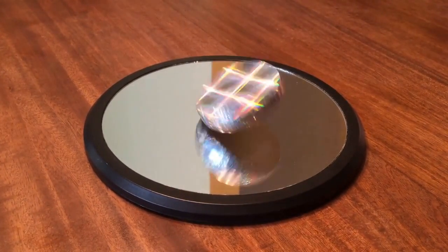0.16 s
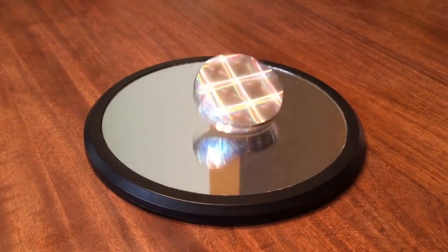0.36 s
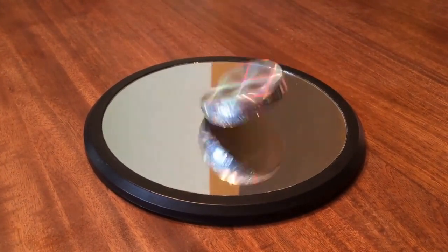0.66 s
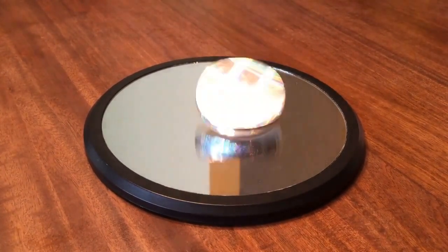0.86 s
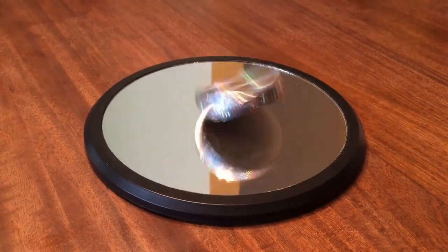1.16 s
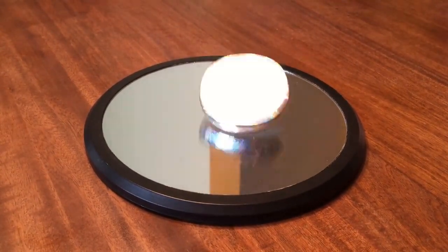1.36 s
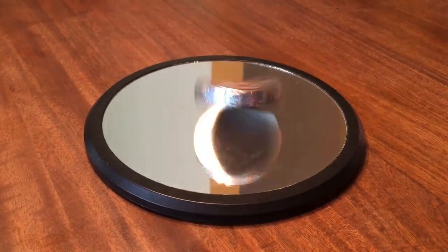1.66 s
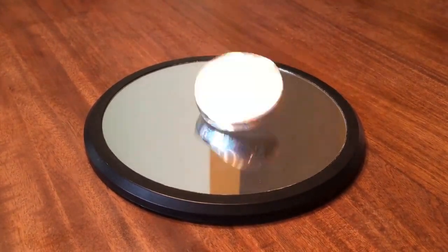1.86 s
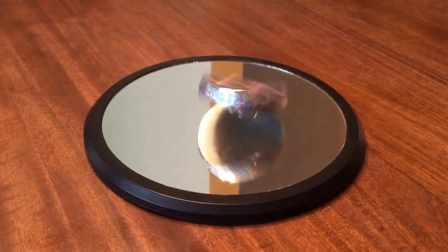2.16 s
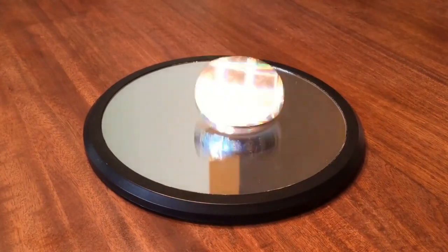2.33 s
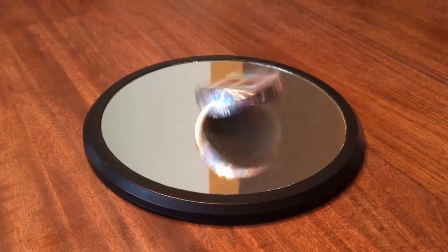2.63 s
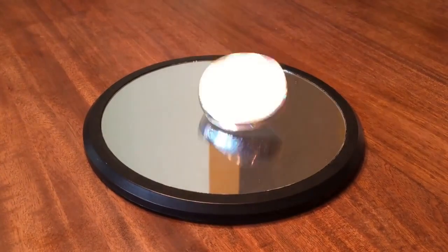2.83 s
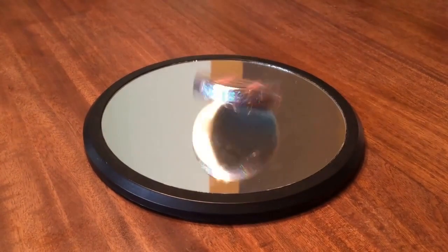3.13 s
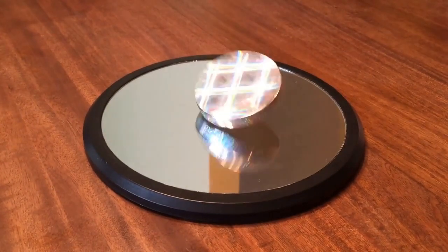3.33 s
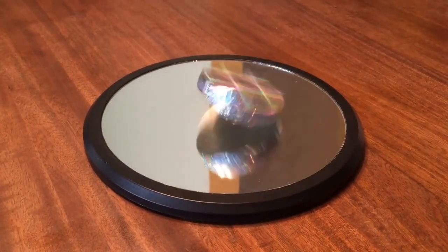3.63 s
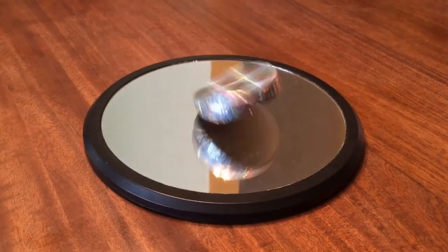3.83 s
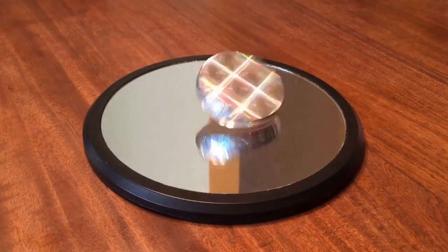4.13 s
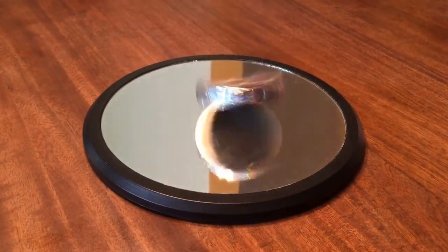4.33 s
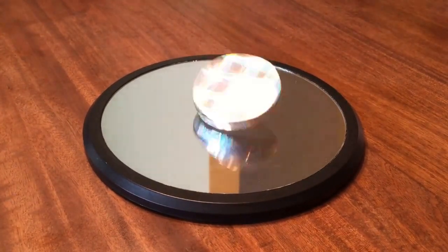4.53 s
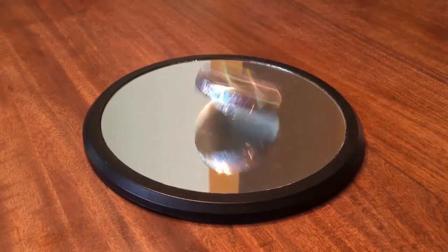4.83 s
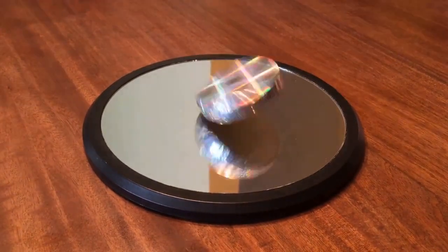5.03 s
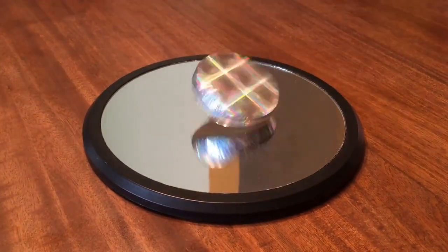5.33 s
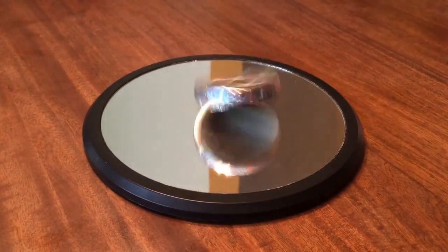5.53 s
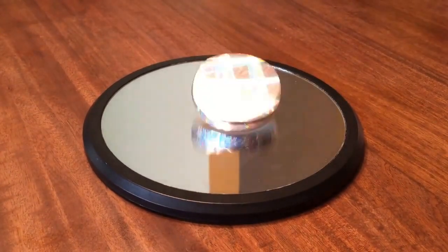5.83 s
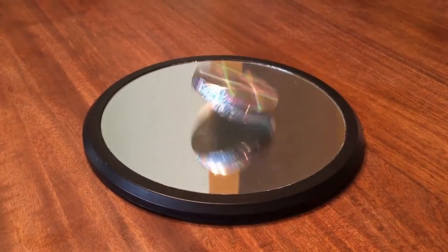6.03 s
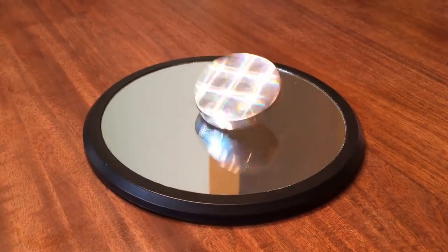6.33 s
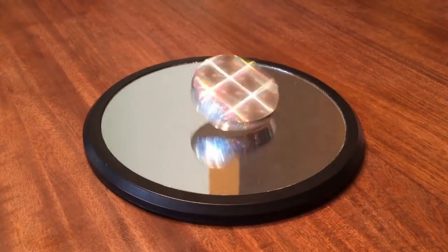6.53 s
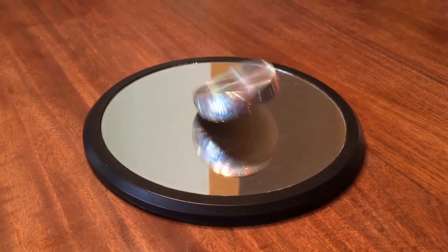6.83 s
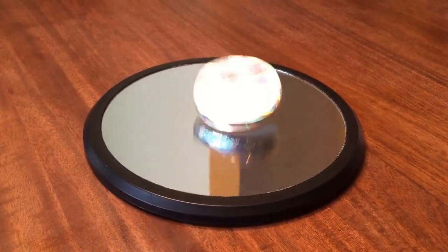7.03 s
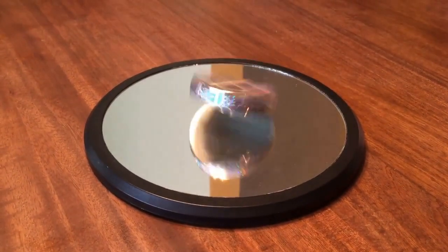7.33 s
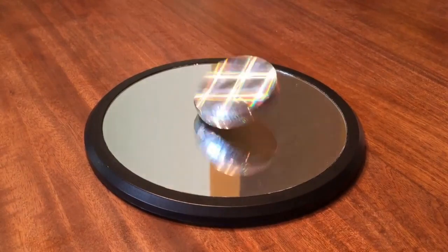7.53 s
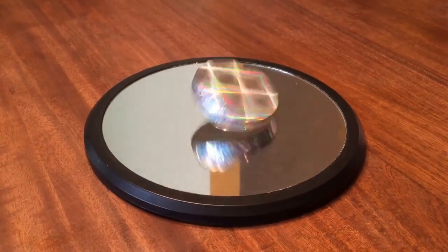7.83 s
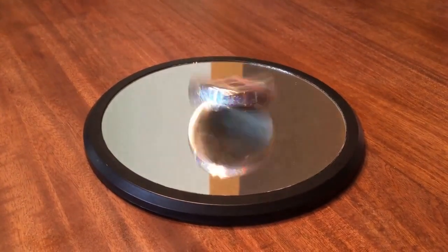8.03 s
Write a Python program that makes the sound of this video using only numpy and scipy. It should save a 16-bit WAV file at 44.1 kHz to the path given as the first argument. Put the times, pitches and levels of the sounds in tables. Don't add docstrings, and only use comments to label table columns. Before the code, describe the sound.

Continuous rapid rolling whir of a weighty metal disc on glass, pulsing about seven times a second, with small grit knocks and a low appliance hum.

```python
import sys
import numpy as np
from scipy import signal
from scipy.fft import rfft, irfft
from scipy.io import wavfile
from scipy.ndimage import uniform_filter1d

SR = 44100
rng = np.random.default_rng(int(sys.argv[2]) if len(sys.argv) > 2 else 0)


def boost(x):
    u = np.asarray(x, float) / 20
    return 10 ** u


def wrap_up_sound(samples):
    columns = np.atleast_2d(samples).T
    tamed = np.clip(columns, -1, 1)
    steps = np.round(tamed * 32767).astype(np.int16)
    wavfile.write(sys.argv[1], SR, steps)


N = 360738
STEP = 32

# (per s cubed, per s squared, per s, start) [turns]
ORBIT = [2.87e-5, .027335, 6.78224, 0]
# (per s cubed, per s squared, per s, start) [turns]
ROLL = [6.03e-5, .020105, 8.12143, 0]
# (pitch [Hz], width [Hz], level [dB])
DISH = [(330, 25, -17), (380, 41, -16.5), (436, 27, -25), (518, 30, -23), (653.5, 15.7, -8),
        (682.2, 51.7, -5.5), (740, 31, -6.5), (777, 87, -24), (877, 33, -13), (949.5, 48, -5.5),
        (993, 43, -3.5), (1043, 32.5, -2), (1083, 76, -3), (1113, 38, -2), (1193, 32, -14),
        (1350, 102, -15.5), (1469.5, 104, -2.5), (1586, 119, -4.5), (1702, 77, -10), (1769, 51, -5.5),
        (1840, 56, -9.5), (1961, 50, -11.5), (2193, 46, -18), (2346, 122, -12.5), (2530, 75, -23.5)]
# (pitch [Hz], width [Hz], level [dB])
DISC = [(2930, 198, -18.5), (3377, 168, -14), (3736, 430, -17), (4127, 133, -11.5), (4427, 156, -10.5),
        (5130, 70, -20), (5460, 195, -18.5), (5910, 110, -21), (6510, 386, -16.5), (7115, 430, -20),
        (8170, 520, -24.5), (9000, 910, -28), (9640, 500, -26.5), (11050, 300, -39), (11330, 320, -28.5),
        (11800, 600, -34.5), (13700, 680, -36), (14500, 1200, -54)]
# (once-a-turn swing [dB], its peak [turns], twice-a-turn swing [dB], its peak [turns])
DISH_BEAM = [(-0.8, 0.49, 1, 0.57), (1.2, 0.45, 2, 0.29), (0.9, 0.25, 6, 0.57), (5, 0.082, 1, 0.29),
             (-2, 0.38, 3.5, 0.26), (1.5, 0.58, 1, 0.29), (2.5, 0.67, 2.9, 0.43), (0, 0.74, -3, 0.59),
             (4, 0.64, 0, 0.45), (1, 0.55, -0.6, 0.15), (1.5, 0.62, 0.5, 0.58), (1.4, 0.82, 0, 0.0085),
             (-0.5, 0.61, 0.6, 0.02), (0.9, 0.57, 1.7, 0.52), (5, 0.56, 1.1, 0.31), (7.5, 0.82, 1.8, 0.17),
             (0.6, 0.36, 0.1, 0.32), (3, 0.52, 0, 0.27), (5, 0.66, 1.8, 0.1), (4, 0.6, 2.1, 0.17),
             (-1.5, 0.66, 2.5, 0), (5.5, 0.72, 2, 0.08), (6, 0.98, -3.5, 0.61), (2.3, 0.53, 2, 0.4),
             (8, 0.51, -2, 0.12)]
# (once-a-turn swing [dB], its peak [turns], twice-a-turn swing [dB], its peak [turns])
DISC_BEAM = [(3, 1, 2.8, 0.46), (3.97, 0.58, 2.2, 0.25), (0.36, 0.98, 0.2, 0.16), (3, 0.88, 1.2, 0.07),
             (2.3, 0.64, 0.57, 0.23), (1.4, 0.94, 2.0, 0.24), (1.5, 0.66, 1.9, 0.19), (2.8, 1, 1.0, 0.13),
             (2.2, 0.74, 0.94, 0.045), (1.7, 0.88, 1.9, 0.03), (1.3, 0.84, 0.4, 0.17),
             (2.7, 0.83, 0.86, 0.15), (1.4, 0.99, 0.63, 0.1), (1.3, 0.53, 2.1, 0.32),
             (1.7, 0.65, 2.0, 0.37), (3.6, 0.65, 1.6, 0.26), (1.3, 0.6, 1.6, 0.14), (2.4, 0.54, 1.4, 0.15)]


def rolling_disc():
    roll_level_db, table_top_hz = -29.5, 600
    t = np.arange(N) / SR
    slow_t = np.arange(N // STEP + 2) * STEP / SR
    orbit, roll = np.polyval(ORBIT, slow_t), np.polyval(ROLL, slow_t)
    specks = dust(per_s=80, size_db=21.5)
    drives = [roughness(t, specks), roughness(t, specks)]
    modes, beams = DISH + DISC, DISH_BEAM + DISC_BEAM
    shared, own = drift(39, count=1)[0], drift(49.0, count=len(modes))
    air = drift(2.5, count=1)[0]

    at, peak_db, struck_hz, bright_db = knocks(slow_t, orbit, roll)
    spans = (at * SR).astype(int)[:, None] - 70 + np.arange(600)
    shapes = grit(count=len(at))
    luck = rng.standard_normal((len(at), len(modes)))
    out, table = snap(spans, shapes, peak_db), np.zeros(N)

    for k, (hz, width, level_db) in enumerate(modes):
        lobes = np.cos(2 * np.pi * ((1 + k % 4) * orbit + rng.random()))
        gain_db = contact_db(hz, slow_t, orbit, roll)
        gain_db = gain_db + 0.93 * shared * min(1, 2500 / hz) + 1.87 * own[k] + 1.32 * lobes
        facing_db = beam(roll, *beams[k])
        if hz > 12500:
            facing_db = facing_db + 2.0 * air
        force = drives[k % 2] * np.repeat(boost(gain_db + facing_db + roll_level_db), STEP)[:N]

        knock_db = peak_db + knock_reach_db(hz, struck_hz, bright_db)
        knock_db = knock_db + facing_db[spans[:, 0] // STEP] + 2.2 * luck[:, k]
        force[spans] += shapes * boost(knock_db)[:, None]
        ring = boost(level_db + 14) * resonate(force, hz, width)
        if hz < table_top_hz:
            table += ring
        else:
            out += ring
    high_pass = signal.butter(4, table_top_hz, "high", fs=SR, output="sos")
    return table + signal.sosfilt(high_pass, out)


def roughness(t, specks):
    glass = surface(np.polyval(ORBIT, t), likeness=0.64, lumpy_db=1.5)
    rim = surface(np.polyval(ROLL, t), likeness=0.73, lumpy_db=2.5)
    return 0.86 * glass + 0.57 * rim + specks


def surface(turns, likeness, lumpy_db):
    size = SR // 8
    bumps = rng.standard_normal((int(turns[-1]) + 9, size))
    lumps = uniform_filter1d(rng.standard_normal(size), size=60, mode="wrap")
    alike = np.clip(likeness, 0, .95)
    laps = signal.lfilter([np.sqrt(1 - alike ** 2)], [1, -alike], bumps, axis=0)[8:]
    laps = laps * boost(lumpy_db * rms_one(lumps))
    return rms_one(laps[turns.astype(int), (turns % 1 * size).astype(int)])


def dust(per_s, size_db):
    sizes = boost(size_db + 2.55 * np.minimum(rng.exponential(1, N), 2.2))
    sizes = sizes * rng.choice([-1, 1], N)
    return signal.lfilter([.25], [1, -.75], sizes * (rng.random(N) < per_s / SR))


ZONES_HZ = [420, 700, 1050, 1550, 2100, 4000, 8000, 12000]
# (place [turns], width [turns], then gain in each of the eight pitch zones [dB])
TRACK = [
    (.08, 0.091, -11.5, 0.5, 5, 8, 5.5, 3.5, 2, 1.5),
    (.20, 0.18, 3.5, 4.5, 1, -5, 5, 0, 3, 2.5),
    (.47, 0.051, 11, 12.5, 2.5, -5, 3, -0.5, -2, 1),
    (.66, 0.071, -16, -4, -6, -4, 0.5, -1, -2, 0.5),
    (.88, 0.038, -0.5, -5, -4, -4.5, 2.5, 1.5, -0.5, 2),
    (.75, 0.022, 10, 14, 11.5, 7.5, 6, 0.5, 1.5, -12),
]
# (time [s], level [dB])
LOAD = [(0, 0), (.3, .5), (.7, 0), (1.2, 0), (1.7, .5), (2.2, 0), (2.7, 0), (3.2, 0.5), (3.7, -0.2),
        (4.2, 0.5), (4.7, 0), (5.3, 0.84), (5.8, 0), (6.2, 0), (6.7, 0.5), (7.2, .3), (7.7, 0.75),
        (8.18, 1)]
# (pitch [Hz], swing [dB], phase [turns])
BEAT = [
    (603, -0.3, 0.4),
    (1060, -1.2, 1),
    (1950, 0.15, 0.033),
    (5000, -0.1, 1),
]


def contact_db(hz, t, orbit, roll):
    beat = np.array([db * np.cos(2 * np.pi * (roll - orbit - phase)) for _, db, phase in BEAT])
    place_db = by_pitch(places(TRACK, orbit), ZONES_HZ, hz)
    load_db = np.interp(t, *np.transpose(LOAD))
    return place_db + load_db + by_pitch(beat, np.array(BEAT)[:, 0], hz)


def places(table, turns):
    out = 0
    for place, width, *zone_db in table:
        away = (turns - place + .5) % 1 - .5
        out = out + np.outer(zone_db, np.exp(-.5 * (away / width) ** 2))
    return out


def by_pitch(rows, anchors_hz, hz):
    place = np.interp(np.log(hz), np.log(anchors_hz), np.arange(len(anchors_hz)))
    below = min(int(place), len(anchors_hz) - 2)
    return rows[below] + (place - below) * (rows[below + 1] - rows[below])


def beam(turns, once_db, once_at, twice_db, twice_at):
    once = once_db * np.cos(2 * np.pi * (turns - once_at))
    twice = twice_db * np.cos(4 * np.pi * (turns - twice_at))
    return 1.25 * (once + twice)


def resonate(x, hz, width):
    r = np.exp(-np.pi * width * 1.5 / SR)
    section = [(1 - r * r) / 2, 0, -(1 - r * r) / 2, 1, -2 * r * np.cos(2 * np.pi * hz / SR), r * r]
    return signal.sosfilt([section, section], x)


# (time [s],
# peak level [dB], pitch struck most [Hz], brightness [dB])
KNOCKS = [(.083, -3.5, 980, -22), (.206, -10, 950, -9), (0.255, -14, 1440, -10), (0.27, -3, 1090, -15),
          (.82, -6.5, 1120, -25), (.884, -5.5, 1100, -20), (1.007, -8, 1110, -23), (1.52, -12, 735, -15),
          (1.62, -2, 1107, -30), (1.888, -5, 1140, -14), (2.05, 1, 1500, -19), (2.621, -14, 1520, -9),
          (2.635, -10, 1110, -16), (3.122, -12, 746, -8), (3.267, -13, 677, -20), (3.84, -14, 743, -22),
          (3.988, -3.5, 997, -18), (4.35, -8, 1600, -18), (4.353, 1, 710, -15), (4.554, -10, 1150, -10),
          (4.695, -8, 1117, -15), (4.79, -15, 1110, -21), (4.981, -6, 1110, -25), (5.073, -9, 1080, -24),
          (5.405, -7.5, 746, -20), (6.252, -11, 749, -20), (6.391, -12, 1744, -23), (.11, -13, 1100, -22),
          (.458, -13, 1600, -20), (4.465, -14, 1506, -18)]
# (time [s], peak level [dB])
CHIP = [(0, -20), (.6, -9.5), (1.3, -14), (1.7, -19), (2.05, -15), (2.4, -15), (2.85, -13), (3.6, -14),
        (3.95, -22), (4.5, -12), (4.95, -23), (5.25, -5), (5.55, -16), (5.9, -9), (6.8, -7), (8.18, -15)]


def knocks(t, orbit, roll):
    chip_turn, sharp_rim_turn = .745, 0.56
    chip_hz, chip_bright_db = 1270, -17.5
    at = np.interp(np.arange(int(orbit[N // STEP])) + chip_turn, orbit, t)
    sharp_db = 1 * np.cos(2 * np.pi * (np.interp(at, t, roll) - sharp_rim_turn))
    luck_db = 3 * rng.standard_normal(len(at))
    peak_db = np.interp(at, *np.transpose(CHIP)) + sharp_db + luck_db
    struck_hz = chip_hz * 2 ** (0.19 * rng.standard_normal(len(at)))
    chip = [at, peak_db, struck_hz, np.full(len(at), chip_bright_db)]
    return np.hstack([np.transpose(KNOCKS), chip])


def grit(count):
    after = np.arange(600) / SR
    draws = rng.standard_normal((count, 600))
    fall, rise = (after - .002) / 0.003, (.002 - after) / 0.0016
    shapes = draws * np.exp(-np.maximum(fall, rise)) * 0.071
    shapes[:, 70] = np.sign(draws[:, 0])
    shapes[:, [10, 200, 380, 520]] = draws[:, 1:5] * [0.18, 0.42, 0.32, 0.28]
    return signal.lfilter([.5], [1, -.5], shapes)


def snap(spans, shapes, peak_db):
    snaps = np.full(N, 1e-18)
    snaps[spans] += shapes * boost(peak_db + 13.5)[:, None]
    band = signal.butter(3, (657, 1850), "band", fs=SR, output="sos")
    return signal.sosfilt(band, snaps)


def knock_reach_db(hz, struck_hz, bright_db):
    knock_level_db = 11
    if hz < 600:
        return knock_level_db + 18 - 11.5 * np.log2(struck_hz / hz)
    if hz < 2600:
        return knock_level_db - 4.0 * abs(np.log2(hz / struck_hz))
    return knock_level_db + bright_db + 11.5 - 2.0 * np.log2(hz / 3000)


# (pitch [Hz], width [Hz], depth [dB])
DIPS = [
    (568, 147, -11),
    (1237, 62, -7),
    (2720, 480, -6.5),
    (5180, 90, -23),
    (10950, 200, -3),
]


def dips(x):
    for hz, width, depth_db in DIPS:
        w = 2 * np.pi * hz / SR
        half = np.pi * width / SR
        kept = half * boost(depth_db)
        x = signal.lfilter([1 + kept, -2 * np.cos(w), 1 - kept], [1 + half, -2 * np.cos(w), 1 - half], x)
    return x


def rms_one(x):
    return x / np.sqrt(np.mean(x ** 2) + 1e-20)


def drift(rate, count):
    r = np.exp(-2 * np.pi * rate * STEP / SR)
    white = rng.standard_normal((count, N // STEP + 2002))
    slow = signal.lfilter([1], [1, -2 * r, r * r], white)[:, 2000:]
    return slow / slow.std(axis=1, keepdims=True)


def room(x):
    t60_s = 0.25
    after = np.arange(SR // 4) / SR
    turn, out = np.pi * np.polyval(ORBIT, np.arange(N) / SR), 0
    for side in range(3):
        tail = rng.standard_normal(len(after)) * boost(-60 * after / t60_s) * (after > .004)
        tail = signal.lfilter([1], [1, -.3], tail)
        facing = x * np.cos(turn + side * np.pi / 3)
        out = out + signal.oaconvolve(facing, tail / np.linalg.norm(tail))[:N]
    return out


# (time [s], shaft speed [Hz], buzz of its loose panel [dB])
HUM = [(0, 27.17, -50), (.75, 27.06, -50.5), (1.05, 27.2, -42.5), (1.8, 27.41, -42.5), (2.25, 26.84, -45.5),
       (2.6, 26.77, -59), (3.2, 26.68, -59.5), (3.55, 26.95, -47), (3.9, 26.9, -62.5), (4.8, 26.72, -63.5),
       (5.25, 27.25, -44.5), (5.699, 27.3, -42), (6.2, 27.12, -43.5), (7.2, 26.67, -42.5),
       (8.18, 27.08, -41.5)]
# (order [multiple], level [dB], share of the buzz swing [ratio], fade [dB/s])
ORDERS_HEARD = [
    (2, -63, .05, 1),
    (4, -50, 0.8, 0),
    (5, -61.5, .05, -2.2),
    (6, -52, 0.086, -0.9),
    (8, -59.5, -0.31, -0.4),
    (9, -50.5, 0.39, -0.63),
    (10, -63.5, -0.089, -3),
    (12, -74, -1.6, -3.1),
]
# (order [multiple], time [s], length [s], level [dB])
SWELLS = [(9, 0.06, 0.23, 5), (9, 0.41, 0.039, -7), (9, 1.05, 0.077, 5.5), (9, 1.367, 0.04, -19),
          (9, 2.11, 0.1, -8), (9, 6.2, .1, -11), (9, 7.5, 0.069, -16), (9, 5.3, 0.21, -5.5),
          (8, 3, 0.16, 7), (8, 1, 0.18, 7), (8, 2.0, 0.18, -14)]


def appliance():
    t = np.arange(N) / SR
    s, speed_hz, buzz_db = np.transpose(HUM)
    turns = np.cumsum(np.interp(t, s, speed_hz)) / SR
    buzz = np.interp(t, s, buzz_db) + 50
    waver, out = drift(8.0, count=2 * len(ORDERS_HEARD)), 0
    for k, (order, level_db, share, fade_db) in enumerate(ORDERS_HEARD):
        level, phase = [np.interp(t, np.arange(len(w)) * STEP / SR, w) for w in waver[2 * k:2 * k + 2]]
        swell = 0
        for which, at, length, db in SWELLS:
            if round(which) == round(order):
                swell = swell + db * np.exp(-.5 * ((t - at) / length) ** 2)
        angle = 2 * np.pi * (round(order) * turns + rng.random()) + 0.28 * phase
        tone_db = level_db + share * buzz + fade_db * (t - 4) + swell + .7 * level
        out = out + np.sqrt(2) * boost(tone_db) * np.sin(angle)
    return out + rumble()


# (pitch [Hz], level per Hz [dB])
RUMBLE = [
    (20, -24),
    (60, -4),
    (105, -1),
    (140, 8.5),
    (243, 1.5),
    (287, -1),
    (330, -10),
    (430, -41),
    (730, -120),
]


def rumble():
    hz, per_hz_db = np.transpose(RUMBLE)
    bins = np.arange(1, N // 2 + 2) * SR / N
    colour = boost(np.interp(np.log(bins), np.log(hz), per_hz_db, left=-60, right=-90))
    return boost(-48) * rms_one(irfft(rfft(rng.standard_normal(N)) * colour, N))


def scene():
    disc = dips(rolling_disc())
    return (disc + boost(-16) * room(disc) + appliance())[None]


def low_pass(x):
    return signal.sosfilt(signal.butter(12, 15300, fs=SR, output="sos"), x)


def record(dry):
    return low_pass(dry)


dry = scene()
out = record(dry)
wrap_up_sound(out)
```